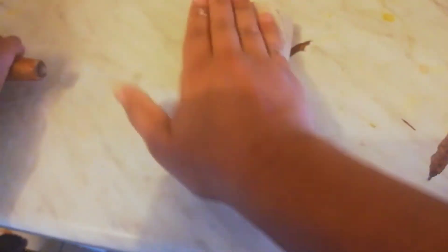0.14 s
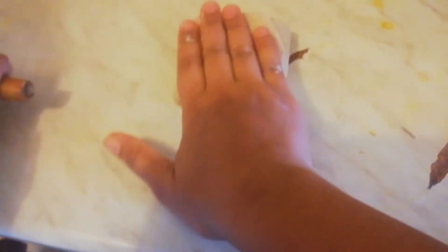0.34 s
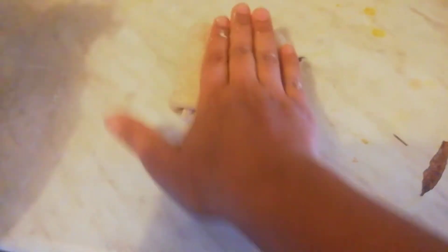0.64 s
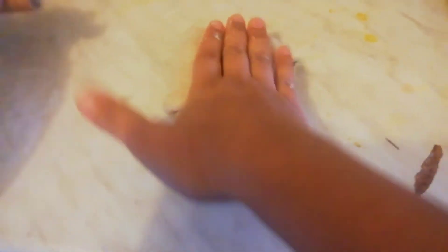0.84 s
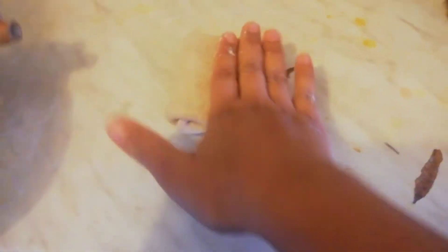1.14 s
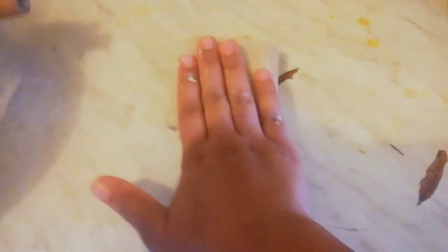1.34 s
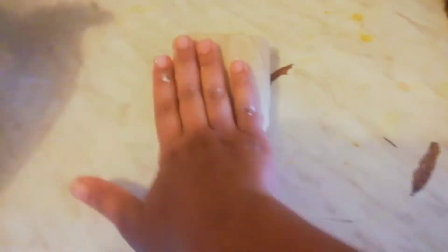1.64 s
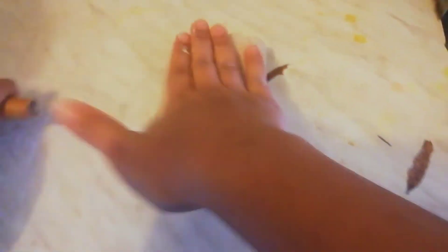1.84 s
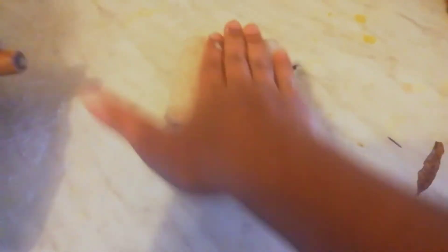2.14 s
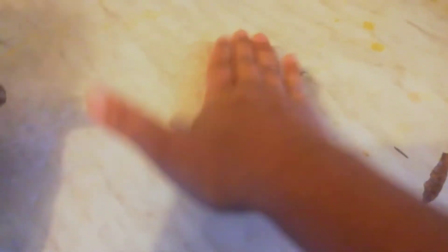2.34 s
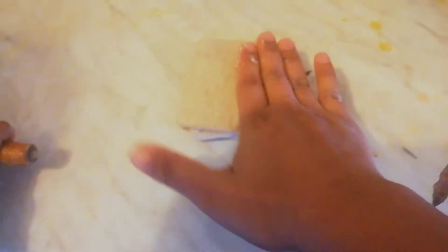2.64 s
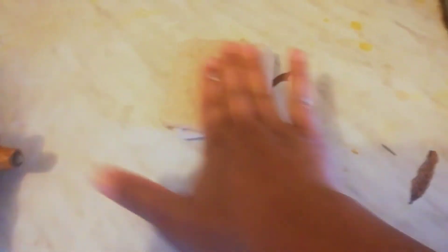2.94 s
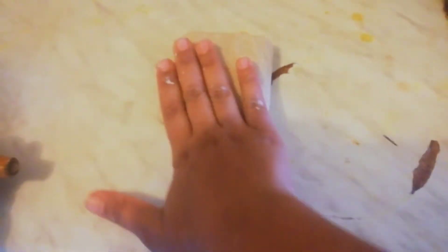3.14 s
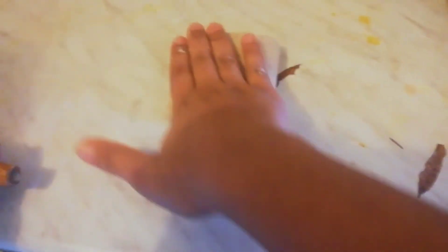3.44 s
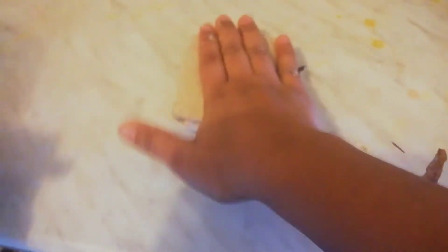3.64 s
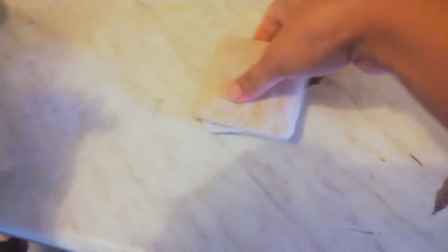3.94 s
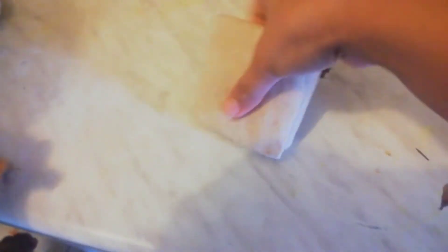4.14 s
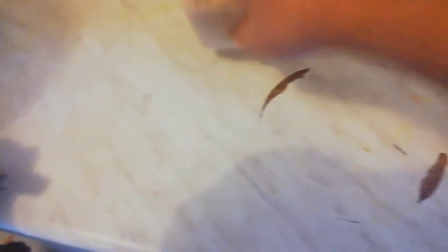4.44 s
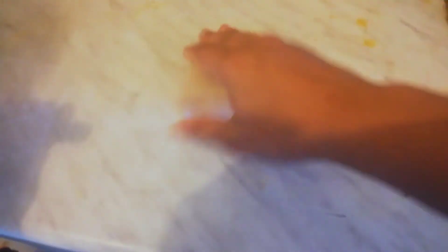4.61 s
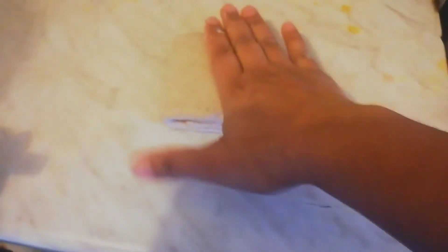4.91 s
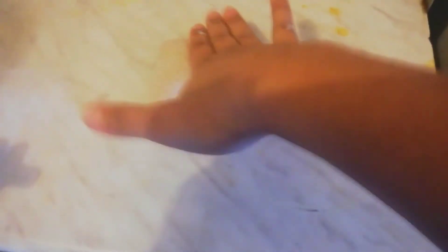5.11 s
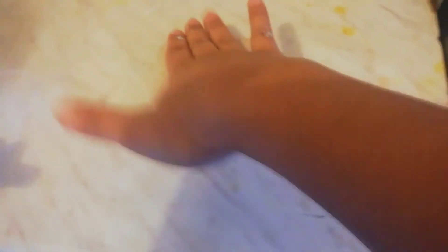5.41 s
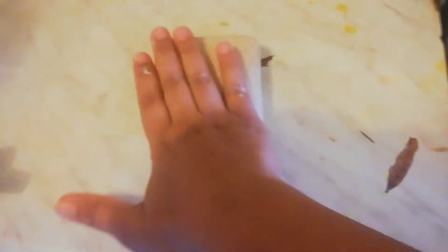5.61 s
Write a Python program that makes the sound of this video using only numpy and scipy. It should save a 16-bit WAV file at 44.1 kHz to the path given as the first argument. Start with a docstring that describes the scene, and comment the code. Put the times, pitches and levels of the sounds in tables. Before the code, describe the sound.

A hand works folded dough on a stone counter, heard close up in a small kitchen with a short, hard echo. Just before 1 second, sticky skin peels away in a cluster of clicks over a low cabinet thud. A pat with a pop of trapped air lands at 1.1 seconds. The two loudest slaps come at about 1.9 and 2.5 seconds, each making the counter ring and boom briefly, with a sticky click between them. More small clicks and a soft scuff follow around 3.5 seconds. From 4 seconds comes a run of duller, deeper thumps, at roughly 4.1, 4.4, 4.8 and 5.1 seconds, the first with another air pop. A light tap and click close at 5.5 seconds. The palm hisses faintly as it slides between blows. Behind everything, a distant clock ticks very faintly once a second over a low hum.

```python
"""You hear a flat hand patting and slapping folded dough on a stone counter in a small, hard-walled kitchen.
Each slap is one pulse of pressure that makes the counter ring and boom; sometimes trapped air pops out.
Leaning on the counter thuds the cabinet below. Sticky skin clicks as it lifts and hisses as it slides.
Behind it all, a clock ticks faintly over a low hum."""
import sys
import numpy as np
from scipy import signal
from scipy.fft import rfft, irfft, next_fast_len
from scipy.io import wavfile
from scipy.ndimage import uniform_filter1d

SR = 44100
rng = np.random.default_rng(int(sys.argv[2]) if len(sys.argv) > 2 else 0)


def to_wav(s):
    """Save 16-bit WAV."""
    ch = np.atleast_2d(s).T  # columns
    pcm = np.round(np.clip(ch, -1, 1) * 32767)  # PCM
    wavfile.write(sys.argv[1], SR, pcm.astype(np.int16))


N = 254475

# Levels are relative. A higher corner_hz is a harder touch; a higher tilt is a brighter sound.
# The hand lands: start_s, level_db, corner_hz, boom_db, snap_db, snap_tilt_db_per_octave
HAND_SLAPS = [(1.1084, -20, 738, 9, -30.5, -6), (1.753, -28.5, 489, -13, -32, 0),
              (1.8541, -2, 1180, 3, -35.5, 7.5), (2.515, -8.5, 1313, 12, -11, -5),
              (2.5328, -1.5, 1210, 13.5, -23, 1.5), (4.0652, -14.5, 810, 24, -35, 4.5),
              (4.4133, -15, 830, 25.5, -26.5, -2.5), (4.626, -32, 1410, 7, -14, 4),
              (4.8201, -23.5, 572, 28, -21, -8.5), (5.1471, -25.5, 510, 30, -30.5, -16),
              (5.4970, -40, 2100, -2.5, -16, -5)]
# Trapped air escapes just after some slaps: start_s, level_db
AIR_POPS = [(1.1112, -11.5), (1.8582, -3), (4.0699, -6.5)]
# Weight leans on the counter: start_s, level_db, corner_hz
LEANS = [(0.145, -57, 87), (0.817, -28, 41.6), (.895, -45.5, 116), (1.251, -45.5, 101),
         (1.574, -62.5, 104.5), (3.029, -50.5, 75), (3.593, -50, 78.5), (4.624, -40.5, 84.5),
         (5.495, -47.5, 79.4)]
# Sticky skin lets go: start_s, level_db, tilt_db_per_octave, knock_db
SKIN_PEELS = [(0.151, -31.5, -1, 0), (0.822, -15.5, -7, -5), (.8308, -14.5, 3.5, 13.5), (.877, -23, -2, -5),
              (0.9, -5.5, -0.5, 19.5), (0.916, -16.5, 0, 13), (1.257, -28.5, -0.5, -1),
              (2.0950, -14, -3, 21), (2.121, -18.5, 0, 15), (3.031, -28, -3, 0), (3.33, -28, 2, -11.5),
              (3.528, -13, -0.5, 16), (5.5075, -24.5, 1.5, -2)]
# The palm slides: fastest_s, level_db, run_up_s, tilt_db_per_octave
PALM_STROKES = [(0.55, -67, 0.084, -0.5), (1.76, -59, 0.11, 5.5), (2.51, -55.5, 0.068, -2.5),
                (3.6, -56.5, 0.056, -0.5), (3.8, -64.5, .03, 1.5), (3.904, -57.5, .018, -3),
                (4.001, -61, 0.049, -3.5), (4.59, -55, 0.11, 1), (4.75, -60.5, 0.029, 0.5),
                (5.77, -67.5, 0.064, 1.5)]
# The dough scuffs softly: loudest_s, level_db, width_s
DOUGH_SCUFFS = [(0.112, -53.5, 0.015), (3.441, -46, 0.013), (3.483, -59, 0.075)]

# Modes are the notes a thing rings at: pitch_hz, gain_db, t60_s (time to fade by 60 dB)
COUNTER_MODES = [(38, 1, 0.24), (62, 5.5, 0.54), (76.8, 3.5, 0.91), (86.6, 16.5, .4), (115.6, 14.5, 0.71),
                 (138.7, 20.5, 0.54), (172.5, 11.5, .35), (223.5, 6, 0.44), (248, 15, 0.32),
                 (283, 5.5, 0.75), (314.1, 17.5, .25), (339, 12.5, 0.2), (347, 18, 0.34), (387.3, 15, .25),
                 (395, 5.5, 0.26), (460, 9, .3), (447, 10, 0.35), (511, 10, 0.38), (566, 11.5, 0.53),
                 (644, 13, 0.3), (740, 13, 0.25), (807, 16, 0.33), (853, 16, .4), (928, 17, 0.31),
                 (960, 15, 0.25), (1043, 19.5, 0.3), (1260, 15.5, .33), (1347, 16.5, .33),
                 (1444, 16.5, 0.32), (1502, 17.5, 0.32)]   # counter and cabinet
SLAB_MODES = [(200, -9.5, .12), (262.4, -4, 0.15), (351.8, -0.5, .1), (442, -4.5, .09), (600, -4.5, .13)]   # the dough pad knocking on the counter
HOLLOW_MODES = [(960, 7, 0.06), (1598, -0.5, 0.16), (3480, -7.5, 0.087)]   # the hollow under the hand

# A colour says how strong a noise is from bass to treble: frequency_hz, level_db
SNAP_COLOUR = [(300, -14), (1000, -2.5), (1900, 7.5), (2700, -5.5), (3400, 7), (4500, -2.5), (7000, 2.5),
               (10000, 1), (12500, -9.5), (16000, -31.5)]   # skin landing
PEEL_COLOUR = [(100, -7), (250, 5), (500, -1.5), (1000, 4), (2000, 5.5), (4000, 0), (7000, -2.5),
               (10000, 4.5), (12500, -6.5), (16000, -25.5)]   # skin letting go
PALM_COLOUR = [(300, -10.5), (1000, -11.5), (2000, -4.5), (4000, -5), (7000, -6), (10000, 0.5), (12500, -9),
               (16000, -21)]   # skin sliding
DOUGH_COLOUR = [(100, -13), (250, -3), (390, 10), (600, -9), (1500, -11), (4000, -19.5), (16000, -33)]   # dough scuffing
TICK_COLOUR = [(200, -26.5), (500, -12.5), (900, -10), (1650, -10.5), (2050, 0), (2500, -14.5),
               (3200, -13.5), (5000, -24), (16000, -37)]   # the clock
KITCHEN_COLOUR = [(40, -31), (130, 1), (250, 0), (400, 6.5), (620, -2), (850, 2.5), (1550, 4), (2500, 5),
                  (3400, 7.5), (8000, 13), (16000, -9.5)]   # the room's echo
AIR_COLOUR = [(15, -33.5), (25, 3.5), (92, -6), (309, -17), (394, -14.5), (476, -24), (1560, -22.5),
              (2050, -25.5), (2610, -23), (3430, -24.5), (9320, -27.5), (14400, -31), (16000, -40.5)]   # the quiet room

# Bounces off nearby surfaces: delay_s, level_db
NEAR_ECHOES = [(.0016, -13), (.0043, -4), (.0068, -11.5)]
# How long the room rings: frequency_hz, t60_s
ROOM_DECAY = [(60, .6), (160, 0.47), (420, 0.37), (1100, 0.41), (2900, 0.42), (8000, 0.3), (15000, 0.23)]
# How alike room sound is on the left and right: frequency_hz, likeness (0 to 1)
STEREO_LIKENESS = [(60, 1), (150, 0.96), (300, .75), (600, 0.17), (1200, 0.074), (16000, 0.022)]
# Shadow on the right side: frequency_hz, gain_db (anything above 0 counts as 0)
RIGHT_SHADOW = [(100, 4.5), (350, -2), (550, -3.5), (1100, -4), (3000, -6), (6000, -4), (9500, -14.5),
                (16000, -17)]

EVENT_SAMPLES = SR   # each short sound gets one second to die away


def slaps(usual_corner_hz=800):
    """Each landing is a blow, with the boom of the dough pad knocking the counter and a snap of skin on top."""
    out = np.zeros((2, N))
    for start_s, level_db, corner_hz, boom_db, snap_db, tilt_db in HAND_SLAPS:
        force = -from_db(level_db) * pulse(corner_hz, order=3)
        add(out, start_s, blow(force, hardness_octaves=np.log2(corner_hz / usual_corner_hz)))
        # each mode acts twice, so the boom takes a few cycles to build
        boom = sum(resonate(resonate(force, [mode]), [mode]) for mode in SLAB_MODES)
        add(out, start_s, from_db(boom_db) * to_stereo(boom))
        snap = skin_crackle(tilted(SNAP_COLOUR, tilt_db), t60_s=0.04, direct_db=-5)
        add(out, start_s, force.sum() * from_db(snap_db) * snap)
    return out


def blow(force, hardness_octaves):
    """Air squeezed from under the hand makes a puff; the same blow rings the counter."""
    # a soft touch pushes less air and puts more of its weight into the counter and the room
    puff_gain = from_db(-4.5 + 6 * hardness_octaves)
    ring_gain = from_db(0.5 - 4 * hardness_octaves)
    room_gain = from_db(8.5 - 4 * hardness_octaves)
    # air carries the change in the force, so the puff swings both ways
    puff = cut_bass(force, corner_hz=330, order=1)
    near = puff + sum(from_db(db) * delayed(puff, delay_s) for delay_s, db in NEAR_ECHOES)
    tail = kitchen_echo(KITCHEN_COLOUR)
    # arm, wall and cupboards scatter the puff before the room takes over
    scatter = from_db(-3) * noise(KITCHEN_COLOUR, EVENT_SAMPLES) * fade(t60_s=0.048)
    room = echoed(puff, tail + scatter)
    return to_stereo(puff_gain * near + ring_gain * resonate(force, COUNTER_MODES)) + room_gain * room


def air_pops(room_db=-10):
    """Air pops out as the palm closes and reaches left and right at the same time."""
    out = np.zeros((2, N))
    puff = cut_bass(pulse(corner_hz=1015, order=4), corner_hz=280, order=1)
    for start_s, level_db in AIR_POPS:
        room = echoed(puff, kitchen_echo(KITCHEN_COLOUR))
        add(out, start_s, from_db(level_db) * (puff + from_db(room_db) * room))
    return out


def cabinet_thuds(give_db=-5, ring_db=6):
    """A slow push makes the cabinet give a little and stirs mainly its lowest notes."""
    out = np.zeros((2, N))
    for start_s, level_db, corner_hz in LEANS:
        force = -from_db(level_db) * pulse(corner_hz, order=3)
        give = from_db(give_db) * cut_bass(force, corner_hz=35, order=2)
        ring = from_db(ring_db) * resonate(force, COUNTER_MODES)
        add(out, start_s, to_stereo(give + ring))
    return out


def skin_peels(hollow_db=-1):
    """Sticky skin clicks as it lifts, and knocks the hollow under the hand."""
    out = np.zeros((2, N))
    knock = to_stereo(resonate(signal.unit_impulse(EVENT_SAMPLES), HOLLOW_MODES))
    for start_s, level_db, tilt_db, knock_db in SKIN_PEELS:
        click = skin_crackle(tilted(PEEL_COLOUR, tilt_db), t60_s=0.02, direct_db=-6.5)
        hollow = from_db(hollow_db) * resonate(click, HOLLOW_MODES)
        add(out, start_s, from_db(level_db) * (click + hollow + from_db(knock_db) * knock))
    return out


def skin_crackle(colour, t60_s, direct_db, grain_db=4):
    """Skin meets or leaves the dough in a short, grainy burst that echoes in the room."""
    grain = uniform_filter1d(rng.standard_normal(EVENT_SAMPLES), size=24)
    shape = fade(t60_s) * from_db(grain_db * grain / grain.std())
    burst = noise(colour, EVENT_SAMPLES)[0] * shape / np.linalg.norm(shape)
    return from_db(direct_db) * to_stereo(burst) + kitchen_echo(colour)


def rubbing(stop_s=0.05, grain_db=2.5, hiss_boost_db=3):
    """Sliding skin hisses unevenly, louder the faster it moves; the dough makes a lower scuff."""
    t, hiss = np.arange(N) / SR, 0
    for fastest_s, level_db, run_up_s, tilt_db in PALM_STROKES:
        speed = np.exp(-np.maximum((fastest_s - t) / run_up_s, (t - fastest_s) / stop_s))
        hiss = hiss + from_db(level_db) * speed * steady_noise(tilted(PALM_COLOUR, tilt_db))
    grain = uniform_filter1d(rng.standard_normal(N), size=200)
    flutter = from_db(hiss_boost_db + grain_db * grain / grain.std())
    swells = sum(from_db(level_db) * np.exp(-.5 * ((t - loudest_s) / width_s) ** 2)
                 for loudest_s, level_db, width_s in DOUGH_SCUFFS)
    return flutter * hiss + swells * steady_noise(DOUGH_COLOUR)


def clock(first_s=0.412, rise_s=0.034, level_db=-57):
    """A far-off clock ticks once a second; the room blurs each tick into a short swell of noise."""
    since_tick_s = (np.arange(N) / SR - first_s) % 1
    age = since_tick_s / rise_s
    swell = (age * np.exp(1 - age)) ** 2
    return from_db(level_db) * swell * steady_noise(TICK_COLOUR)


def background(air_db=-61, hum_hz=75.4, hum_db=-69, whine_hz=9292, whine_db=-89):
    """The air in the room rushes softly, with a low hum and a thin electrical whine."""
    t = np.arange(N) / SR
    hum, whine = np.sqrt(2) * np.sin(2 * np.pi * np.outer([hum_hz, whine_hz], t))
    return from_db(air_db) * steady_noise(AIR_COLOUR) + from_db(hum_db) * hum + from_db(whine_db) * whine


def kitchen_echo(colour, build_s=0.0036):
    """The room's answer to a click: it builds up fast, and the bass lingers longest."""
    spectrum = rfft(noise(colour, EVENT_SAMPLES))
    hz = np.fft.rfftfreq(EVENT_SAMPLES, 1 / SR)
    centres_hz, t60s = np.transpose(ROOM_DECAY)
    # split the noise into overlapping bands, each fading at its own speed
    bands = [at_hz(np.c_[centres_hz, weights], hz) for weights in np.eye(len(centres_hz))]
    tail = sum(irfft(spectrum * band, EVENT_SAMPLES) * fade(t60_s) for band, t60_s in zip(bands, t60s))
    return tail * (1 - np.exp(-np.arange(EVENT_SAMPLES) / SR / build_s))


def echoed(sound, echo):
    """Play a sound through a stereo echo."""
    return signal.fftconvolve(echo, sound[None], axes=1)[:, :EVENT_SAMPLES]


def to_stereo(sound, lag_s=0.0006):
    """Close sound reaches the right side a little later."""
    return np.array([sound, delayed(sound, lag_s)])


def shadowed(sound):
    """The right side faces away and gets less treble."""
    left, right = sound
    gain_db = np.minimum(at_hz(RIGHT_SHADOW, np.fft.rfftfreq(2 * N, 1 / SR)), 0)
    return np.array([left, irfft(rfft(right, 2 * N) * from_db(gain_db))[:N]])


def pulse(corner_hz, order):
    """One push of height 1: the softer it is, the longer and duller."""
    soften = signal.butter(order, corner_hz, fs=SR, output="sos")
    shape = signal.sosfilt(soften, signal.unit_impulse(EVENT_SAMPLES) + 1e-18)
    return shape / shape.max()


def resonate(sound, modes):
    """Let a sound ring each mode, and add up the results."""
    out = 0
    for pitch_hz, gain_db, t60_s in modes:
        decay = np.exp(-np.log(1000) / (t60_s * SR))
        feedback = [1, -2 * decay * np.cos(2 * np.pi * pitch_hz / SR), decay ** 2]
        ring = signal.lfilter([1, 0, -1], feedback, sound + 1e-18)
        out = out + from_db(gain_db) * (1 - decay ** 2) / 2 * ring
    return out


def noise(colour, size):
    """Coloured stereo noise: left and right are alike in the bass and unrelated in the treble."""
    hz = np.fft.rfftfreq(2 * next_fast_len(size // 2 + 1), 1 / SR)
    mid, side = rfft(rng.standard_normal((2, 2 * len(hz) - 2)))
    alike = np.clip(at_hz(STEREO_LIKENESS, hz), 0, 1)
    both = np.sqrt((1 + alike) / 2) * mid + np.sqrt((1 - alike) / 2) * side * [[1], [-1]]
    return irfft(both * from_db(at_hz(colour, hz)))[:, :size]


def steady_noise(colour):
    """Noise for the whole scene, with an average (rms) level of 1."""
    sound = noise(colour, N)
    return sound / sound.std()


def fade(t60_s):
    """A fade-out with a total energy of 1."""
    shape = np.exp(-np.log(1000) * np.arange(EVENT_SAMPLES) / SR / t60_s)
    return shape / np.linalg.norm(shape)


def tilted(colour, tilt_db, pivot_hz=3000):
    """Brighten or dull a colour by tilt_db per octave; below 1000 Hz it keeps its shape."""
    return [(hz, db + tilt_db * np.log2(max(hz, 1000) / pivot_hz)) for hz, db in colour]


def cut_bass(sound, corner_hz, order):
    """Weaken everything below corner_hz."""
    return signal.sosfilt(signal.butter(order, corner_hz, "high", fs=SR, output="sos"), sound)


def delayed(sound, delay_s):
    """The same sound, a little later."""
    samples = np.arange(len(sound))
    return np.interp(samples - delay_s * SR, samples, sound, left=0)


def add(out, start_s, sound):
    """Mix a sound in from start_s on."""
    start = max(round(start_s * SR), 0)
    out[:, start:start + sound.shape[-1]] += sound[..., :N - start]


def at_hz(table, hz):
    """Read between a table's rows, giving every octave equal room."""
    row_hz, values = np.transpose(table)
    return np.interp(np.log(np.maximum(hz, 1)), np.log(row_hz), values)


def from_db(db):
    """Turn decibels into a multiplier."""
    return 10 ** (np.asarray(db) / 20)


def scene():
    """The hand at work and the clock, over the quiet of the kitchen."""
    sources = slaps() + air_pops() + cabinet_thuds() + skin_peels() + rubbing() + clock()
    return shadowed(sources) + background()


def record(dry, rumble_hz=29, top_hz=15500):
    """Remove the deepest rumble, round off the loudest peaks and cut the highest treble."""
    lean = cut_bass(dry, rumble_hz, order=2)
    rounded = lean / (1 + lean ** 4) ** (1 / 4)
    return signal.sosfilt(signal.ellip(10, .1, 80, top_hz, fs=SR, output="sos"), rounded)


dry = scene()
out = record(dry)
to_wav(out)
```